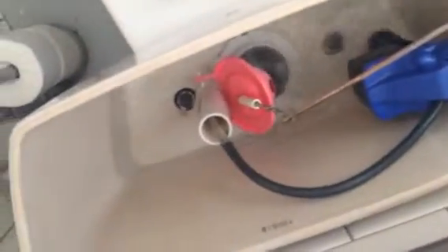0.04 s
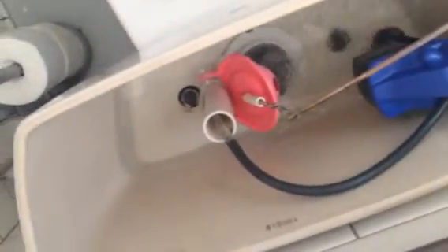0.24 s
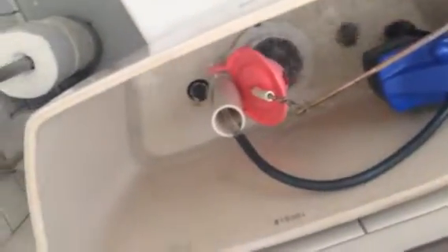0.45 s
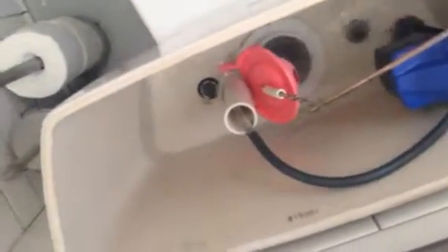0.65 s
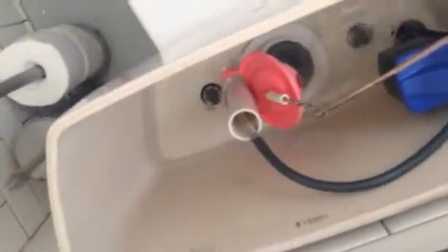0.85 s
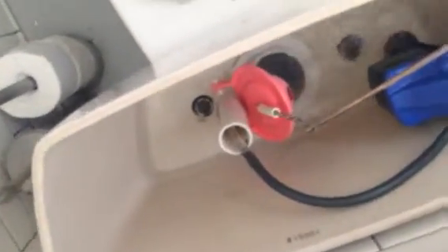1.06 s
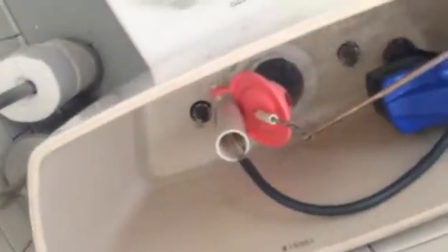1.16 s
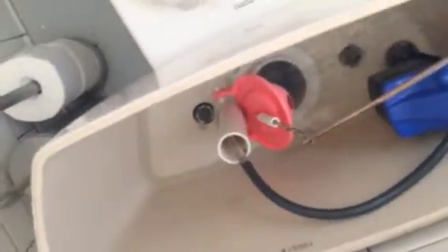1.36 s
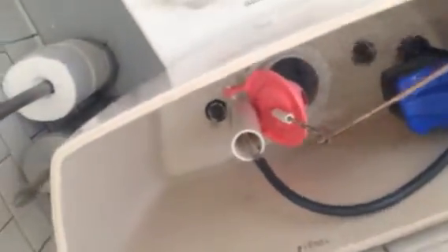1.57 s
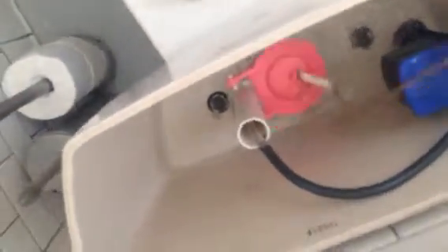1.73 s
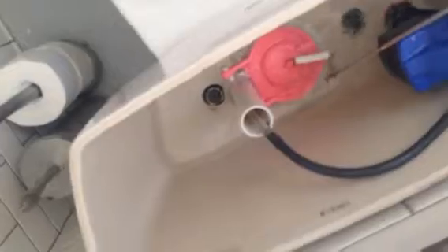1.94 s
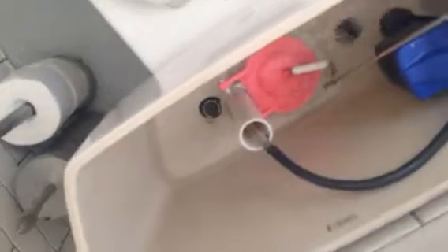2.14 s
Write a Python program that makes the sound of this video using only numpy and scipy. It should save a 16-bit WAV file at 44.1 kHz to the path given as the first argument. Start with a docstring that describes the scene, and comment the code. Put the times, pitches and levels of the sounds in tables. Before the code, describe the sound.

Water hisses and gurgles out of a toilet tank until the flapper claps shut.

```python
"""Hiss, splashing and low gurgles: the last water drains from an open toilet tank as the fill valve runs.
The drain gulps air in big low bubbles, small ones plink, and water spatters on the tank floor.
Near the end the plastic flapper claps shut and the water thuds under it.
The ceramic tank rings with the water, and a small tiled room adds a short tail."""
import sys
import numpy as np
from scipy import signal
from scipy.fft import rfft, irfft, next_fast_len
from scipy.io import wavfile
from scipy.ndimage import uniform_filter1d, map_coordinates

SR = 44100
rng = np.random.default_rng(int(sys.argv[2]) if len(sys.argv) > 2 else 0)


def unload_wav(signal):
    """Save mono or channel-first audio to the path in sys.argv[1] as 16-bit WAV at rate SR, clipped to [-1, 1]."""
    wavfile.write(
        sys.argv[1],
        SR,
        np.round(np.clip(np.atleast_2d(signal).T, -1, 1) * 32767).astype(np.int16),
    )


N = 97020


def amp(db):
    """Decibels to gain."""
    return 10 ** (np.asarray(db) / 20)


def unit(x):
    """Scale to rms 1."""
    return x / np.sqrt(np.mean(x ** 2) + 1e-20)


def along(points, hz):
    """Read (f/Hz, value) breakpoints on a log frequency axis."""
    f, value = np.transpose(points)
    return np.interp(np.log(hz + 1), np.log(f + 1), value)


def curve(rows):
    """An envelope, one value per sample, from (t/s, value) breakpoints."""
    return np.interp(np.arange(N) / SR, *np.transpose(rows))


def wobble(per_s):
    """Smooth random modulation with per_s knots a second."""
    return map_coordinates(rng.standard_normal(400), [np.arange(N) * per_s / SR], mode="mirror")


def fade(t, t60):
    """Exponential decay, 60 dB down at t60."""
    return np.exp(-np.log(1000) * t / t60)


def add(track, s, sound):
    """Mix a sound in at time s."""
    part = track[max(0, round(s * SR)):][:len(sound)]
    part += sound[:len(part)]


def filtered(x, response):
    """Apply a complex frequency response."""
    size = next_fast_len(N + SR // 2)
    return irfft(rfft(x, size) * response(np.fft.rfftfreq(size, 1 / SR)), size)[:N]


def bell(f, centre_hz, octaves):
    """A bell-shaped passband, with its half width in octaves."""
    return np.exp(-.5 * (np.log2((f + 1) / centre_hz) / octaves) ** 2)


def coloured(x, colour):
    """Minimum-phase EQ of energy 1, shaped by (f/Hz, level/dB) breakpoints."""
    size = 8192
    gain = amp(along(colour, np.fft.rfftfreq(size, 1 / SR)))
    cepstrum = irfft(np.log(gain))
    causal = np.r_[cepstrum[0], 2 * cepstrum[1:size // 2]]
    impulse = irfft(np.exp(rfft(causal, size)))
    return signal.fftconvolve(x, impulse / np.linalg.norm(impulse))[:N]


def patchy_noise(depth_db):
    """White noise that flickers in random patches of time and frequency."""
    spectrum = signal.stft(rng.standard_normal(N), nperseg=512)[2]
    patches = uniform_filter1d(rng.standard_normal(spectrum.shape), 5, axis=0)
    patches = uniform_filter1d(patches, 10, axis=1)
    return unit(signal.istft(spectrum * amp(depth_db * unit(patches)), nperseg=512)[1][:N])


def tank(x):
    """The ceramic tank's standing waves ring on top of the direct sound."""
    # standing waves: f/Hz, width/Hz, gain
    modes = [(137, 4.3, 1.9), (170.4, 3, 2.3), (218.2, 4.8, 1.9), (262.7, 8.8, 0.48), (354.4, 8.4, 1.53),
             (670, 21, 1.1), (800, 14, 2.1), (879.4, 8.7, 1.33), (990, 8, 2.2), (2155, 73, 1.32),
             (3516, 30, 0.74)]
    return filtered(x, lambda f: 1 + sum(gain * 1j * f * width / (hz * hz - f * f + 1j * f * width)
                                         for hz, width, gain in modes))


def room(x, wet_db):
    """Add the small tiled room's tail, duller than the direct sound."""
    # reverb time: f/Hz, t60/s
    decay_times = [(150, 0.96), (500, 0.6), (2000, 0.57), (5000, 0.47), (12000, 0.41)]
    hz, t, spectrum = signal.stft(rng.standard_normal(SR * 3 // 4), SR, nperseg=256)
    decay = amp(-60 * t / along(decay_times, hz)[:, None])
    tail = signal.istft(spectrum * decay, SR, nperseg=256)[1]
    tail *= 1 - np.exp(-np.arange(len(tail)) / SR / 0.0012)
    wet = signal.fftconvolve(x, tail / np.linalg.norm(tail))[:N]
    return x + amp(wet_db) * filtered(wet, lambda f: 0.57 + 0.58 / (1 + (f / 4300) ** 20))


def bubbles(rows, attack_s, glide, rough=0):
    """Bubbles ring as damped tones, bent by the share glide over t60; trembling walls roughen them."""
    out = np.zeros(N)
    for s, hz, db, t60 in rows:
        t = np.arange(int(abs(t60) * SR) + 2) / SR
        tone = np.sin(2 * np.pi * hz * (t + glide * t * t / (2 * t60)))
        attack = (1 - np.exp(-2 * t / attack_s)) ** 2
        add(out, s, amp(db) * tone * fade(t, t60) * attack)
    return out * (1 + rough * wobble(170.05))


def swarm(per_s, low_hz, high_hz, cycles, spread_db):
    """Random bubbles in the room, each chirping up as it nears the surface; rms 1."""
    when, pitch, size, life = rng.random((int(per_s * N / SR), 4)).T
    hz = low_hz * (high_hz / low_hz) ** pitch
    db = -spread_db * np.log(size + .03)
    t60 = cycles * (.5 + life) / hz
    stream = bubbles(np.c_[when * N / SR, hz, db, t60], attack_s=0.00026, glide=0.064)
    return unit(room(stream, wet_db=-3))


def valve_hiss():
    """The fill valve's jet hisses into the tank with a fizz of tiny bubbles."""
    # hiss envelope: t/s, relative level/dB
    envelope = [(0.0, -46.5), (0.14, -44), (0.48, -41.5), (1.08, -41), (1.46, -43), (1.77, -42),
                (1.94, -44.5), (2.08, -44.5), (2.2, -49)]
    # jet spectrum: f/Hz, level/dB
    colour = [(900, -25.5), (1800, -13), (2500, -3), (3050, -5), (3600, 2.5), (4300, -0.5), (5100, -4),
              (6300, -12.5), (8000, -24), (11000, -31.5), (15000, -39)]
    fizz = swarm(per_s=1100, low_hz=1723, high_hz=9560, cycles=14.5, spread_db=6)
    jet = unit(coloured(patchy_noise(depth_db=2.5), colour)) + amp(-2) * unit(coloured(fizz, colour))
    return unit(tank(jet)) * amp(curve(envelope) + 1 + 0.41 * wobble(24.35))


def splash():
    """Shallow water splashes and bubbles over the tank floor."""
    # splash envelope: t/s, relative level/dB
    envelope = [(0.0, -38), (0.23, -42), (0.39, -35), (0.77, -36), (1.09, -34.5), (1.43, -37), (1.88, -38),
                (2.06, -43.5), (2.2, -46.5)]
    # splash spectrum: f/Hz, level/dB
    colour = [(150, -33), (300, -9), (440, 0.5), (550, 5), (720, -1), (880, -1), (1100, -1), (1700, -2),
              (2200, -2.5), (2800, -2.5), (4500, -36), (10000, -52)]
    wash = amp(2) * patchy_noise(depth_db=2.5)
    froth = amp(-9.5) * swarm(per_s=280, low_hz=804, high_hz=3286, cycles=61, spread_db=3)
    water = unit(tank(coloured(wash + froth, colour)))
    return water * amp(curve(envelope) - 2 + 0.65 * wobble(16.1))


def drain_churn():
    """Water churns down the outlet in low, uneven surges."""
    # churn envelope: t/s, relative level/dB
    envelope = [(0.0, -47.5), (0.15, -45), (0.39, -33.5), (0.46, -49), (0.6, -48), (0.68, -36), (0.78, -45),
                (0.95, -39), (1.17, -41), (1.32, -42), (1.5, -35.5), (1.58, -37), (1.72, -50),
                (1.85, -37.5), (1.93, -49), (2.0, -54), (2.2, -44.5)]
    # churn spectrum: f/Hz, level/dB
    colour = [(30, -58), (70, -44), (130, -18), (200, -6.5), (260, 1.5), (310, 0), (360, -7), (430, -21.5),
              (800, -58), (3000, -85)]
    surges = rng.standard_normal(N) * amp(4.0 * wobble(34.59))
    return unit(tank(coloured(surges, colour))) * amp(curve(envelope) + 1.5)


def pipe():
    """The pipe rumbles, and its air column drones on one wavering note."""
    # rumble envelope: t/s, relative level/dB
    envelope = [(0.0, -45), (0.1, -51), (0.45, -51), (0.83, -51.5), (1.52, -53.5), (1.7, -55), (2.2, -47.5)]
    # rumble spectrum: f/Hz, level/dB
    colour = [(20, -45), (40, -21), (60, -19.5), (80, -3), (95, -5.5), (135, -5), (220, -40), (500, -48),
              (2000, -75)]
    # drone envelope: t/s, level/dB
    swell = [(0.0, -62), (0.75, -64), (1.0, -51.5), (1.7, -48), (1.85, -53), (2.2, -48.5)]
    rumble = unit(coloured(rng.standard_normal(N), colour))
    drone = unit(np.sin(2 * np.pi * 80.8 * np.arange(N) / SR + 0.42 * wobble(8.9)))
    return rumble * amp(curve(envelope) + 2.5) + drone * amp(curve(swell))


def faint_hiss():
    """A steady, nearly white bed of noise far under the water."""
    return amp(-70) * coloured(rng.standard_normal(N), [(100, 1), (8000, -3), (15000, 1)])


def gulps():
    """The drain swallows air in big low bubbles that sag in pitch."""
    # gulped air: t/s, f/Hz, level/dB, t60/s
    big_bubbles = [(.047, 240, -28.5, 0.066), (.068, 249, -27, 0.15), (.205, 253, -22.5, 0.074),
                   (.262, 233, -17.5, 0.041), (.291, 260, -15.5, 0.039), (.328, 196, -23, 0.088),
                   (.344, 229, -15.5, 0.032), (.357, 208, -24, 0.12), (.421, 255, -15, 0.064),
                   (.460, 238, -17, 0.059), (.478, 243, -19, 0.046), (.511, 260, -15.5, 0.081),
                   (.537, 265.4, -17.5, 0.17), (.646, 277, -30.5, 0.097), (.690, 268, -27, 0.1),
                   (.880, 274, -20.5, 0.059), (.975, 225, -32, 0.098), (1.004, 259, -33, 0.13),
                   (1.096, 253, -28.5, 0.075), (1.145, 345, -26, 0.1), (1.225, 265, -38, 0.057),
                   (1.300, 263, -34.5, 0.079), (1.432, 260, -25, 0.1), (1.533, 284, -19, 0.12),
                   (1.605, 315, -13, 0.032), (1.616, 286, -9, 0.031), (1.630, 351, -16.5, 0.062),
                   (1.671, 280, -7.5, 0.06), (1.685, 293, -10.5, 0.04), (1.705, 336, -17, 0.038),
                   (1.735, 232, -13.5, 0.066), (1.784, 289, -20.5, 0.091), (1.792, 247, -14, 0.12)]
    return bubbles(big_bubbles, attack_s=0.0035, glide=-0.052, rough=0.063)


def spatters():
    """Water spatters on the tank floor: bursts of tiny drops and bubbles, each in its own band."""
    # spatters: t/s, level/dB, centre f/Hz, t60/s
    bursts = [(0.14, -32, 3580, 0.11), (.141, -37, 1310, 0.091), (0.215, -31, 1260, .1),
              (0.28, -25, 1520, 0.06), (0.298, -29, 497, 0.072), (0.361, -31.5, 3930, 0.18),
              (.358, -29, 1060, 0.088), (.378, -28.5, 1330, 0.15), (0.396, -33.5, 644, 0.13),
              (0.488, -29.5, 1710, 0.14), (0.514, -29.5, 4600, 0.078), (0.562, -28, 3470, 0.05),
              (0.659, -33, 1830, 0.14), (0.843, -28, 1900, 0.05), (.940, -32.5, 2400, 0.21),
              (1.158, -32.5, 1500, 0.08), (1.216, -33, 2680, 0.13), (1.274, -29, 2560, 0.054),
              (1.350, -36, 550, 0.21), (1.510, -32, 3000, .1), (1.665, -30.5, 1110, 0.15),
              (1.771, -32, 3640, 0.12), (2.099, -39, 2230, 0.24)]
    fizz = swarm(per_s=1800, low_hz=415, high_hz=7030, cycles=25.5, spread_db=5.5)
    spray = unit(fizz + rng.standard_normal(N))
    out, t = np.zeros(N), np.arange(SR // 4) / SR
    attack = 1 - np.exp(-t / 0.0053)
    for s, db, hz, t60 in bursts:
        band = unit(filtered(spray, lambda f: bell(f, hz, octaves=0.4) / (1 + (f / 5400) ** 10)))
        burst = np.roll(band, -round(s * SR))[:len(t)]
        add(out, s, amp(db) * burst * fade(t, t60) * attack)
    return room(out, wet_db=-6)


def plinks():
    """Small bubbles burst with bright, slightly rising notes."""
    # bursting bubbles: t/s, f/Hz, level/dB, t60/s
    small_bubbles = [(.143, 1345, -31, 0.12), (.150, 1055, -38, .1), (.215, 1273, -20.5, 0.031),
                     (.222, 556, -32.5, 0.12), (.226, 993, -30, 0.062), (.235, 1360, -23.5, 0.052),
                     (.285, 2060, -24.5, 0.035), (.286, 915, -26.5, 0.15), (.298, 895, -21, 0.047),
                     (.303, 1227, -26.5, 0.065), (.338, 950, -33, 0.062), (.352, 886, -27.5, 0.14),
                     (.364, 1053, -32, 0.057), (.378, 1364, -25, 0.054), (.385, 578, -26, 0.094),
                     (.413, 1400, -23, 0.032), (.495, 1314, -37.5, 0.24), (.535, 868, -36, 0.29),
                     (.669, 2180, -35, 0.041), (.916, 862, -37, 0.21), (1.001, 893, -30.5, 0.07),
                     (1.121, 895, -29.5, 0.068), (1.205, 942, -33, 0.089), (1.223, 2610, -21, 0.039),
                     (1.572, 871, -31.5, 0.11), (1.700, 577, -34, 0.09), (2.005, 888.5, -33, 0.25)]
    return bubbles(small_bubbles, attack_s=0.002, glide=0.019, rough=0.23)


def droplets():
    """Fine spray and a few larger drops tick against the tank's walls."""
    # larger drops: t/s, level/dB, centre f/Hz
    drips = [(.447, -60, 10000), (.643, -53.5, 6800), (1.138, -53, 7540), (1.977, -62, 11500),
             (2.096, -58, 7260)]
    ticks = amp(-76.5) * swarm(per_s=31, low_hz=5700, high_hz=12200, cycles=20, spread_db=0)
    t = np.arange(SR // 8) / SR
    for s, db, hz in drips:
        band = unit(filtered(rng.standard_normal(N), lambda f: bell(f, hz, octaves=0.25)))
        add(ticks, s, amp(db) * band[:len(t)] * fade(t, t60=.045))
    return ticks


def thuds():
    """The stopped water slams under the flapper in low, rough pulses."""
    # water slams: t/s, f/Hz, level/dB, t60/s
    slams = [(1.813, 170, -11.5, 0.043), (1.8145, 226, -11.5, 0.087), (1.816, 290, -14, 0.071),
             (1.817, 120, -18.5, .09), (1.838, 196, -6.5, 0.033), (1.858, 270, -12, 0.06),
             (1.872, 77, -22, 0.12), (1.901, 265, -21.5, 0.086), (1.926, 246, -20.5, 0.088),
             (2.02, 77, -42, 0.12), (2.11, 99, -27.5, 0.12)]
    return bubbles(slams, attack_s=0.0055, glide=0.032, rough=0.43)


def flapper():
    """The flapper claps shut, chatters and squeezes out a squirt of water; its wet seat rings."""
    # flapper contacts: t/s, relative level/dB
    clacks = [(1.815, -3.5), (1.8165, -1), (1.8205, -9.5), (1.8242, -8), (1.8435, -17), (1.855, -11.5)]
    # spectrum of the clap and squirt: f/Hz, level/dB
    colour = [(100, -8), (300, -16), (700, -11), (1050, 7), (1500, 0.5), (2200, 4), (2700, 3.5),
              (3200, -5.5), (3900, 4.5), (5100, -6), (5800, -14), (8000, -30.5), (11000, -39.5),
              (15000, -48)]
    # modes of flapper and seat: f/Hz, level/dB, t60/s
    seat_modes = [(1016, -21, 0.062), (1177, -27.5, 0.05), (1493, -37, 0.23), (1734, -27, 0.11),
                  (2070, -29, 0.22), (2154, -26, 0.16), (2660, -22, 0.019), (3190, -27, 0.086),
                  (3555, -30, 0.12), (3950, -11, 0.018), (4770, -13, 0.011)]
    clap, ring, t = np.zeros(N), np.zeros(N), np.arange(SR // 2) / SR
    shut_s, slosh_per_s = clacks[0][0], 168
    for s, db in clacks:
        add(clap, s, amp(db - 8.5) * fade(t, t60=.011) * rng.standard_normal(len(t)))
    squirt_envelope = amp(-31.5 + 3.4 * wobble(150)[:len(t)]) * fade(t, t60=0.25)
    add(clap, shut_s, squirt_envelope * rng.standard_normal(len(t)))
    attack = 1 - np.exp(-t / 0.0012)
    for hz, db, t60 in seat_modes:
        # water on the seat detunes and damps each mode unsteadily
        drift_rad = 1.5 * wobble(slosh_per_s)[:len(t)]
        flutter_db = 4 * wobble(slosh_per_s)[:len(t)]
        tone = np.sin(2 * np.pi * hz * t + drift_rad)
        add(ring, shut_s, amp(db + flutter_db) * fade(t, t60) * attack * tone)
    return room(coloured(clap, colour), wet_db=-6.5) + room(ring, wet_db=-9)


def trapped_air():
    """Air caught under the closed flapper rings with hollow notes."""
    # air pockets: t/s, f/Hz, level/dB, t60/s
    pockets = [(1.820, 501.3, -20.5, 0.18), (1.852, 510, -25.5, 0.13), (1.906, 505, -25, 0.15),
               (1.955, 449, -36, 0.35)]
    return bubbles(pockets, attack_s=0.0075, glide=0.008, rough=0.22)


def scene():
    """The mono mix, heard from above the tank; the low gurgles sit drier than the plinks."""
    water = valve_hiss() + splash() + spatters() + drain_churn() + pipe()
    gurgles = room(gulps() + thuds() + trapped_air(), wet_db=-13.5)
    bubbling = tank(gurgles + room(plinks(), wet_db=-8))
    return (water + bubbling + droplets() + flapper() + faint_hiss())[None]


def record(dry):
    """A brick-wall low-pass trims the very top."""
    return filtered(dry[0], lambda hz: hz < 15400)[None]


dry = scene()
out = record(dry)
unload_wav(out)
```